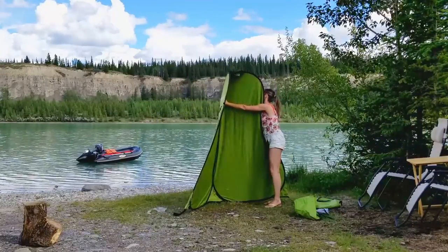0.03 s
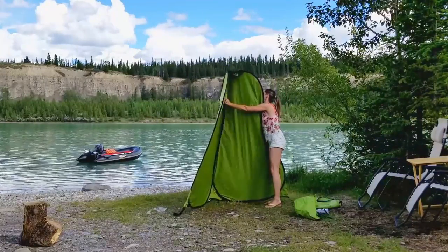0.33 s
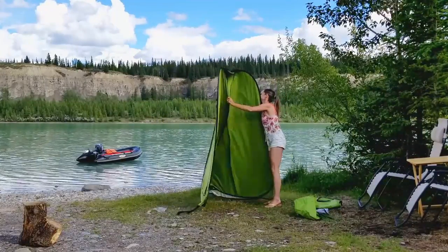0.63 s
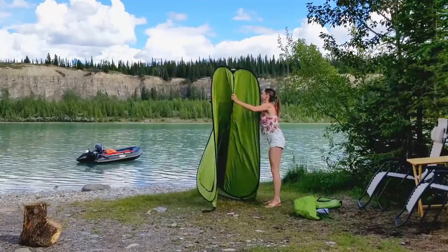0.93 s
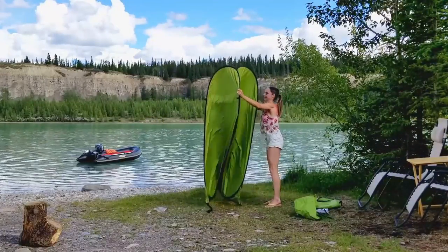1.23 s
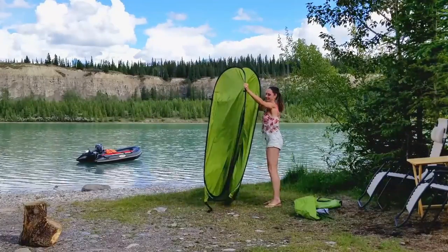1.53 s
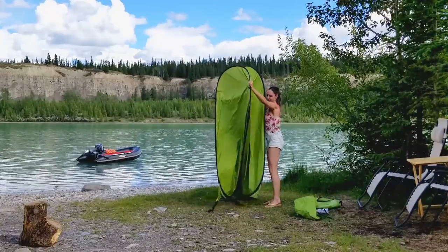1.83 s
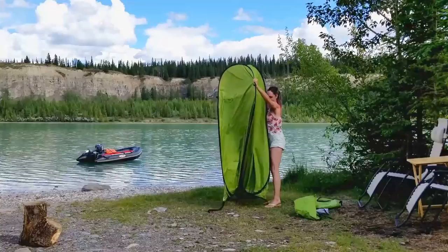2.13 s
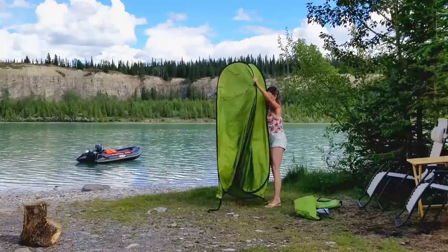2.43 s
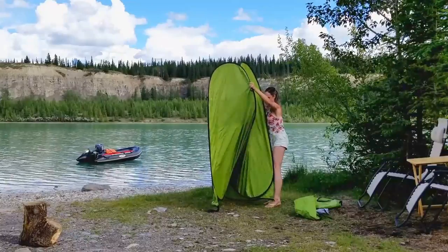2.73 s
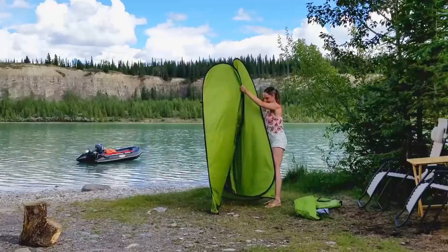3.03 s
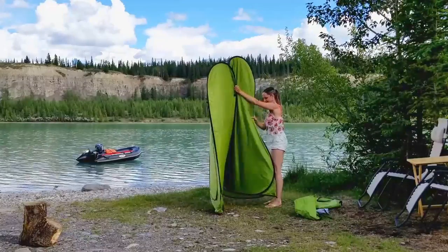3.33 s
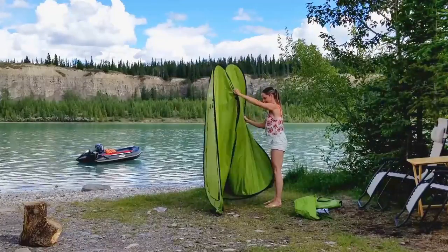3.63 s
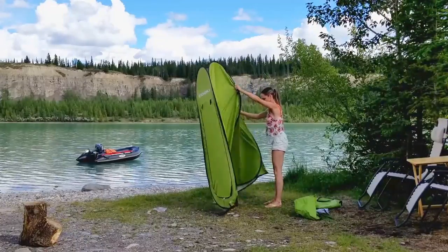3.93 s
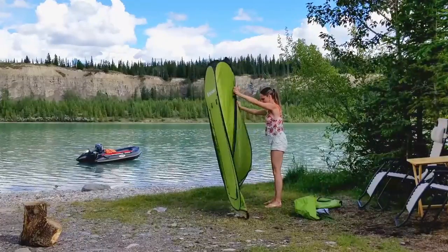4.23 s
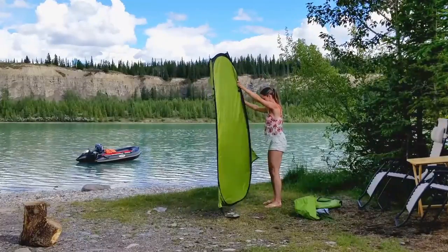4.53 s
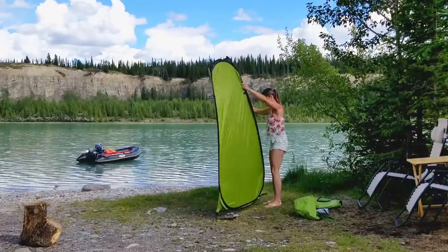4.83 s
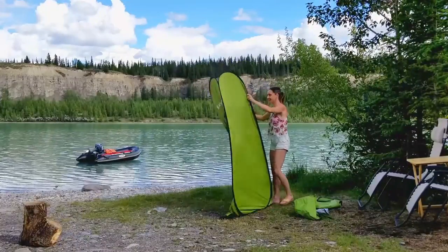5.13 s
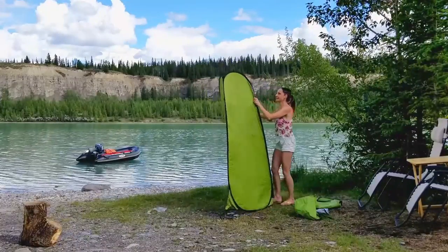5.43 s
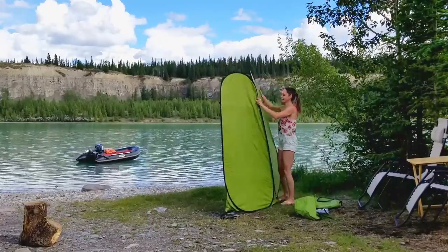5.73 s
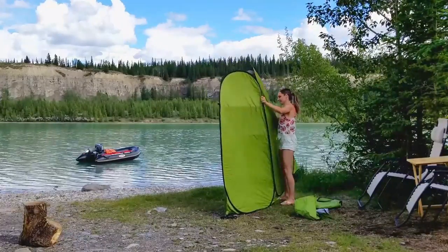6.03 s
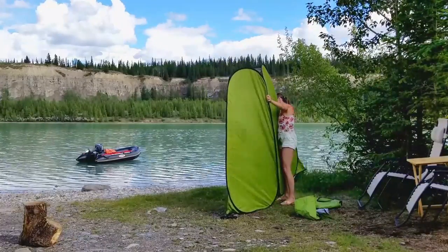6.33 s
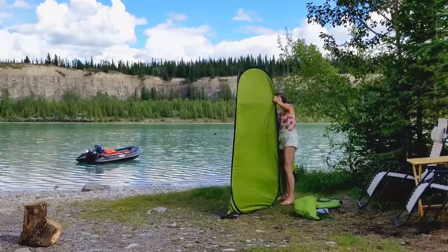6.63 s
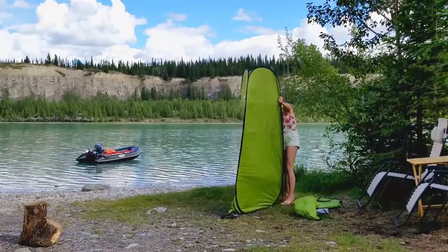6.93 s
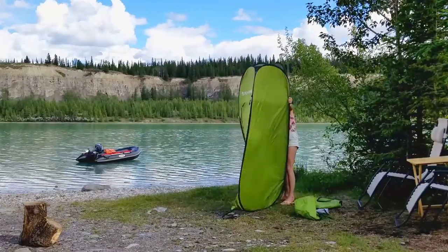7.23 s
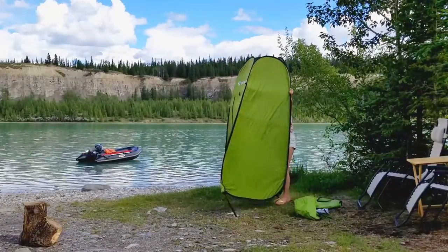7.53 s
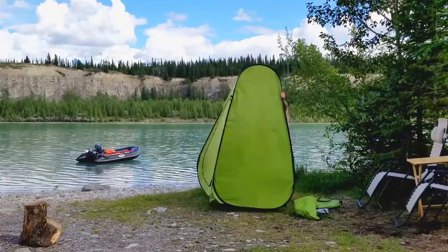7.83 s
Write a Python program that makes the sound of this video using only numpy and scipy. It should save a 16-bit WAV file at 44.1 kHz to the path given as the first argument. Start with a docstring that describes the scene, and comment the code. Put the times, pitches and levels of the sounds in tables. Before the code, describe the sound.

Close, centred nylon rustles in fits and starts as someone folds a pop-up tent outdoors. The fabric slides, crinkles and snaps, with occasional flaps, tiny squeaky skids and low bumps against a body-worn microphone. It eases off, builds to louder pulls, goes nearly still, then returns hissier with many sharp ticks. A high, pulsing grasshopper, a thin hiss of far insects and faint wind sit softly around it throughout.

```python
"""Nylon swishes and crinkles close up, pull by pull: a pop-up tent being folded on a lake shore.
Sliding cloth sounds through tiny fibre slips; creases buckle and snap, panels flap, ribbed weave skids.
The cloth also bumps and brushes a microphone worn by the person folding it.
Behind it, wide in stereo, a grasshopper rasps leg on wing over far insects and a faint breeze."""
import sys
import numpy as np
from scipy import signal
from scipy.fft import rfft, irfft, next_fast_len
from scipy.io import wavfile
from scipy.ndimage import uniform_filter1d, map_coordinates

SR = 44100
rng = np.random.default_rng(int(sys.argv[2]) if len(sys.argv) > 2 else 0)


def store_wav(level_fs):
    """Save 16-bit WAV to argv[1]."""
    pcm = np.round(np.clip(np.atleast_2d(level_fs), -1, 1) * 32767)
    wavfile.write(sys.argv[1], SR, pcm.T.astype(np.int16))


N = 351918

# cloth sliding on itself: (time [s], rise [s], hold [s], fall [s], swish drive [dB],
# folds re swish [dB], hiss re swish [dB])
PULLS = [(.01, 0.045, 0.041, 0.03, -39, -4.5, -17), (.14, .12, 0.14, 0.069, -39.5, -4, -16),
         (.41, 0.059, 0.25, 0.12, -38, -2.5, -5), (.66, 0.27, 0.18, 0.16, -38, -5, -10.5),
         (1.23, .09, 0.023, 0.28, -43.5, -4, -7), (1.55, 0.044, 0.013, 0.081, -44, -28, -5.5),
         (1.782, 0.013, 0.17, 0.13, -49, -10, 1), (2.19, 0.12, 0.051, .1, -49.5, -6.5, -2),
         (2.32, 0.018, .1, .1, -43.5, -2.5, -24), (2.42, 0.053, 0.071, .05, -38, 1, -16),
         (2.58, 0.061, 0.15, 0.12, -37.5, -5, -8.5), (2.81, 0.06, 0.094, .06, -35.5, -5, -10),
         (2.97, 0.05, 0.091, 0.2, -31, -3, -11.5), (3.22, 0.031, 0.054, .04, -36, -1.5, -11),
         (3.32, 0.052, 0.31, 0.082, -32, -2.5, -12), (3.63, 0.059, 0.095, 0.034, -28, -1.5, -17),
         (3.78, 0.028, 0.058, 0.034, -26.5, -1, -10.5), (3.9, 0.06, 0.16, .15, -40.5, -1.5, -5.5),
         (4.185, 0.0073, 0.013, .16, -30.5, -4, -18.5), (4.44, 0.052, 0.016, 0.078, -43, 4, -16),
         (4.6, 0.055, 0.12, .04, -57.5, -1, -21), (4.83, .04, 0.086, 0.1, -48, -29, -14),
         (4.93, 0.058, .13, 0.083, -47, -2, -11.5), (5.18, 0.018, 0.095, 0.17, -47.5, -3.5, -6.5),
         (5.33, 0.099, 0.051, 0.24, -37, -6.5, -11.5), (5.75, 0.11, .06, 0.046, -40, -6, -10),
         (5.91, 0.021, 0.15, 0.055, -33.5, -8.5, -9.5), (6.06, 0.054, .15, 0.054, -34.5, -6.5, -3),
         (6.3, 0.026, 0.037, 0.037, -39, 2, -10), (6.385, 0.039, 0.028, 0.037, -27.5, -4.5, -3),
         (6.5, 0.051, 0.074, 0.054, -41, -6.5, -3), (6.581, 0.063, .2, .045, -35.5, -16.5, 0.5),
         (6.919, 0.014, 0.013, 0.06, -46, 4, -20), (6.97, 0.05, 0.069, .08, -43.5, -1, -10),
         (7.11, 0.12, 0.023, 0.073, -30, -1, -6), (7.3, 0.062, 0.15, 0.078, -38, -7, -6),
         (7.51, 0.058, 0.084, 0.08, -36.5, -23, 0), (7.66, 0.02, .18, 0.052, -30, -8, -2),
         (7.89, .04, 0.041, .05, -39, -1, -14.5)]
# cloth brushing the microphone: (time [s], rise [s], hold [s], rumble drive [dB])
MIC_BRUSHES = [(.01, 0.025, 0.054, -43.5), (.12, 0.14, 0.048, -37.5), (0.333, .02, 0.011, -35),
               (.41, .03, 0.092, -43), (0.605, 0.036, 0.088, -38.5), (1.785, 0.0092, 0.016, -53),
               (2.492, 0.052, .015, -39), (2.694, 0.043, 0.018, -36), (3.138, 0.044, .01, -29.5),
               (3.675, .04, .17, -36), (4.063, 0.016, 0.018, -41), (4.19, .008, .03, -33),
               (4.25, .02, .02, -43), (6.092, 0.07, 0.067, -34.5), (6.3, 0.053, .11, -34.5),
               (7.132, 0.065, .05, -30.5), (7.344, 0.04, .18, -50.5), (7.678, 0.045, 0.14, -34.5),
               (7.91, .04, .03, -43)]
# cloth friction spectra: (frequency [Hz], relative density [dB])
SWISH_SPECTRUM = [(300, -40), (800, -12.5), (1200, -5), (1700, -2.5), (2500, 0), (3300, 0), (4300, -6),
                  (5500, -16), (8000, -25), (16000, -50)]
FOLDS_SPECTRUM = [(90, -19), (220, -11.5), (350, -2.5), (550, 0), (800, 1), (1100, -3), (1700, -12),
                  (4000, -33)]
HISS_SPECTRUM = [(2500, -6), (4200, 0.5), (5500, 0), (7000, -3), (9000, -8.5), (12000, -10), (16000, -21.5)]
RUMBLE_SPECTRUM = [(20, -28), (35, -24), (55, -11), (68, -4.5), (84, 0), (102, -2), (180, -1.5), (260, -5),
                   (400, -10), (1000, -48)]
# loudest creases snapping through: (time [s], level [dB], pitch [Hz])
LOUD_CREASES = [(.3636, -12.5, 606), (.497, -12, 2100), (.5053, -13, 1500), (.5702, -10, 3570),
                 (.6263, -8.5, 3250), (.6728, -14, 1710), (.849, -16, 2900), (.8894, -19.5, 1310),
                (1.3224, -24, 2310), (2.5485, -11.5, 1290), (2.9963, -12, 1450), (3.1483, -18, 1270),
                (3.2662, -10, 2800), (3.3749, -11, 1690), (3.6626, -3.5, 2750), (3.8118, -7.5, 2760),
                (4.1909, -9, 897), (4.1959, -15, 1250), (5.9363, -7.5, 1460), (5.952, -12, 3600),
                (5.9577, -6.5, 1700), (5.9762, -9.5, 3310), (6.0527, -10.5, 3850), (6.069, -9, 4730),
                (6.103, -8, 4500), (6.126, -12.5, 1730), (6.1977, -12.5, 2820), (6.267, -10, 3200),
                (6.3544, -9.5, 4740), (6.3701, -6.5, 2600), (6.447, -4, 3870), (6.65, -9.5, 3200),
                (6.6946, -11, 2860), (7.2421, -6.5, 3450), (7.5095, -15, 3750), (7.8704, -4.5, 4120)]
# panels flapping or bumping: (time [s], level [dB], pitch [Hz], t60 [s])
PANEL_FLAPS = [(.363, -22, 109, 0.08), (.627, -26, 474, 0.036), (.662, -22.5, 373, 0.04),
               (2.546, -25, 730, 0.077), (2.558, -22, 660, 0.029), (2.752, -24.5, 610, 0.073),
               (2.78, -24, 610, 0.059), (3.186, -27.5, 102, .12), (4.189, -17, 690, 0.14),
               (4.194, -25, 190, 0.11), (6.445, -21, 110, .08), (7.242, -24, 109, 0.11),
               (7.747, -15, 500, 0.081), (7.785, -22.5, 81.5, 0.25)]
# ribbed weave skidding: (time [s], length [s], start pitch [Hz], end pitch [Hz], level [dB])
WEAVE_SKIDS = [(1.282, 0.13, 429, 480, -45.5), (1.588, 0.063, 3270, 2430, -39),
               (2.701, 0.011, 3400, 3000, -24), (2.725, 0.0071, 2960, 2680, -25.5),
               (3.0, 0.14, 5530, 4900, -35), (3.265, 0.0084, 3340, 3020, -17),
               (5.39, 0.13, 4920, 5500, -41), (5.467, 0.13, 2330, 2970, -36),
               (5.973, .07, 2110, 1510, -30.5), (6.268, 0.0082, 3220, 3000, -26)]
# grasshopper loudness: (time [s], relative level [dB])
RASP_LEVEL = [(0, -44.5), (.5, -48), (.7, -39.5), (3.6, -44), (5.8, -39), (6.6, -46), (6.8, -44.5),
              (7.98, -65)]
# grasshopper pace: (time [s], stroke rate [Hz])
RASP_RATE = [(.7, 20.85), (2.9, 20.6), (4.4, 20.4), (6.55, 20.7), (6.8, 21.8)]
# grasshopper, far insect and breeze spectra: (frequency [Hz], relative density [dB])
RASP_SPECTRUM = [(3000, -31.5), (6000, -41), (7200, -15.5), (8200, -4.5), (9300, -4.5), (10200, -3),
                 (11100, -3), (12300, 7), (13300, -5), (14100, 2), (14800, 4.5), (15900, -2)]
INSECT_SPECTRUM = [(5000, -61), (7500, -16), (10000, -9), (11200, -5.5), (12400, 1.5), (14000, 2.5),
                   (15900, -3)]
BREEZE_SPECTRUM = [(20, -23), (80, 6), (200, -15), (650, 2), (1500, -26), (2800, 11.5), (4200, 4),
                   (6000, 7), (10000, 3.5), (16000, -18)]


def rustle(swish_gain, folds_gain, hiss_gain, rumble_gain):
    """Panels slide in fits and starts; all four layers catch and release together."""
    # a fast, hissing glide is even; a slow, dull drag catches more
    hiss_re_swish_db = 20 * np.log10(hiss_gain / swish_gain)
    grip = np.clip(0.7 - 0.027 * hiss_re_swish_db, 0.3, 1.5)
    catch_db = grip * (wobble(35) + 1.23 * wobble(170))
    swish = swish_gain * friction(SWISH_SPECTRUM, rate_hz=450, spread_db=4, share=0.27, patchy_db=2)
    folds = folds_gain * friction(FOLDS_SPECTRUM, rate_hz=220, spread_db=9.5, share=0.3, patchy_db=2)
    hiss = hiss_gain * friction(HISS_SPECTRUM, rate_hz=610, spread_db=3.5, share=0.16, patchy_db=2.57)
    rumble = rumble_gain * friction(RUMBLE_SPECTRUM, rate_hz=80, spread_db=8, share=0.2, patchy_db=0.5)
    layers = amp(0.12) * swish + amp(0.5) * folds + amp(2.5) * hiss + amp(-0.75) * rumble
    return amp(catch_db) * layers


def friction(spectrum, rate_hz, spread_db, share, patchy_db):
    """Countless fibre slips, with a share of the power in single crinkles of uneven size."""
    crinkles = rng.random(N) < rate_hz / SR
    sizes = amp(spread_db * np.minimum(rng.exponential(size=N), np.e)) * rng.choice([-1, 1], N)
    force = np.sqrt(share) * unit(crinkles * sizes) + np.sqrt(1 - share) * rng.standard_normal(N)
    return coloured(patchy(force, patchy_db), spectrum)


def patchy(x, depth_db):
    """Shifting folds favour now one band, now another."""
    bands = signal.stft(x, nperseg=512)[2]
    field = uniform_filter1d(rng.standard_normal(bands.shape), size=7, axis=0)
    field = uniform_filter1d(field, size=9, axis=1)
    return signal.istft(bands * amp(depth_db * unit(field)), nperseg=512)[1][:N]


def pulling(idle_db=(-70, -68, -67.5), brush_to_folds_db=-7, folds_to_rumble_db=-17.5):
    """Swish, folds, hiss and rumble gains: pulls, brushes and idle stirring add in power."""
    swish, folds, hiss = (np.full(N, amp(db) ** 2) for db in idle_db)
    for time_s, rise_s, hold_s, fall_s, db, folds_db, hiss_db in PULLS:
        power = amp(db) ** 2 * movement(time_s, rise_s, hold_s, fall_s)
        swish += power
        folds += amp(folds_db) ** 2 * power
        hiss += amp(hiss_db) ** 2 * power
    brush = sum(amp(db) ** 2 * movement(time_s, rise_s, hold_s, fall_s=0.061)
                for time_s, rise_s, hold_s, db in MIC_BRUSHES)
    rumble = brush + amp(folds_to_rumble_db) ** 2 * folds
    folds += amp(brush_to_folds_db) ** 2 * brush
    return np.sqrt([swish, folds, hiss, rumble])


def movement(time_s, rise_s, hold_s, fall_s, lead_s=0.04, depth_db=11.5):
    """Power envelope of one movement: unstick, speed up, glide, come to rest."""
    t = np.arange(N) / SR - time_s
    stuck = np.maximum(-t, 0) / lead_s
    rising = np.maximum(1 - t / rise_s, 0)
    falling = np.maximum(t - rise_s - hold_s, 0) / fall_s
    return amp(-np.minimum(depth_db * (stuck + rising + falling), 100)) ** 2


def snaps(creases, rise_s=0.0001, ring_cycles=4.1, shiver_db=-22, shiver_t60_s=0.037, low_cut_hz=330):
    """A crease buckles: sharp edge, a few cycles of ring, a brief shiver of the cloth around it."""
    track = np.zeros(N)
    t = np.arange(-SR // 500, SR // 25) / SR
    age_s = np.maximum(t, 0)
    cloth_noise = coloured(rng.standard_normal(N), SWISH_SPECTRUM)
    edge = amp(-16) * np.sin(2 * np.pi * 6000 * t) * np.exp(-(t / 0.00009) ** 2)
    for time_s, db, hz in creases:
        swell = np.exp(-(np.minimum(t, 0) / (rise_s + 0.16 / hz)) ** 2)
        ring = np.cos(2 * np.pi * hz * t) * amp(-60 * age_s * hz / ring_cycles)
        shiver = amp(shiver_db - 60 * age_s / shiver_t60_s) * piece(cloth_noise, len(t))
        sharpness = hz / 3500  # small stiff creases are higher and sharper
        snap = swell * (ring + shiver) + sharpness * edge
        add(track, time_s + t[0], rng.choice([-1, 1]) * amp(db) * snap)
    return filtered(track, lambda hz: hz ** 2 / (hz ** 2 + low_cut_hz ** 2))


def small_creases(swish_gain, rate_hz=36, over_db=11.5, spread_db=1.5, centre_hz=2650, spread_oct=0.5):
    """Lesser creases give way at random, as hard as the pull: (time [s], level [dB], pitch [Hz])."""
    onsets = np.flatnonzero(rng.random(N) < rate_hz / SR)
    strength, pitch = np.clip(rng.standard_normal((N, 2))[onsets], -2, 2).T
    db = 20 * np.log10(swish_gain[onsets]) + over_db + spread_db * strength
    return list(zip(onsets / SR, db, centre_hz * 2 ** (spread_oct * pitch)))


def flaps(attack_s=0.00041, damping=1.1):
    """A panel jerks taut: a heavily damped boom, with more crackle the tighter it is."""
    track = np.zeros(N)
    t = np.arange(SR // 4) / SR
    crackle = friction(SWISH_SPECTRUM, rate_hz=900, spread_db=3, share=0.4, patchy_db=1)
    for time_s, db, hz, t60_s in PANEL_FLAPS:
        edges_hz = [hz / (1 + damping), hz * (1 + damping / 2)]
        band = signal.butter(2, edges_hz, "bandpass", fs=SR, output="sos")
        boom = unit(signal.sosfilt(band, rng.standard_normal(2 * len(t)))[len(t):])
        tightness = hz / 700
        crack = amp(-5) * tightness * piece(crackle, len(t))
        envelope = amp(db - 60 * t / t60_s) * (1 - np.exp(-t / attack_s))
        add(track, time_s, envelope * (boom + crack))
    return track


def skids(roughness=0.066):
    """Taut ribbed weave skids over an edge: a short rough whistle, pitch following slide speed."""
    track = np.zeros(N)
    for time_s, length_s, start_hz, end_hz, db in WEAVE_SKIDS:
        progress = np.linspace(0, 1, int(length_s * SR))
        glide_hz = start_hz + (end_hz - start_hz) * progress
        hz = glide_hz * (1 + roughness * wobble(912)[:len(progress)])
        envelope = amp(db) * np.sin(np.pi * np.sqrt(progress)) ** 2
        add(track, time_s, envelope * np.sin(2 * np.pi * np.cumsum(hz) / SR))
    return track


def grasshopper(stroke_db=3, uneven_db=1.35, trim_db=3.5):
    """A leg rasps along the wing; up and down strokes differ slightly."""
    phase_rad = 2 * np.pi * np.cumsum(curve(RASP_RATE)) / SR
    strokes = unit(amp(stroke_db * np.cos(phase_rad) - uneven_db * np.cos(phase_rad / 2)))
    return amp(curve(RASP_LEVEL) + trim_db) * strokes * stereo_noise(RASP_SPECTRUM, correlation=-0.61)


def far_insects():
    """Many distant insects merge into one hiss, slightly to the right."""
    pan = amp([[-0.5], [0.5]])
    return pan * amp(-39 + 0.4 * wobble(13)) * stereo_noise(INSECT_SPECTRUM, correlation=-0.57)


def breeze():
    """Faint, wavering wind over water and trees."""
    return amp(-56 + 3.2 * wobble(2.6)) * stereo_noise(BREEZE_SPECTRUM, correlation=0.69)


def amp(db):
    """Decibels to gain."""
    return 10 ** (np.asarray(db) / 20)


def unit(x):
    """Scale to rms 1."""
    return x / np.sqrt(np.mean(x ** 2) + 1e-20)


def curve(rows):
    """Interpolate (time [s], value) rows per sample."""
    return np.interp(np.arange(N) / SR, *np.transpose(rows))


def wobble(rate_hz):
    """Smooth random curve at rms 1, knots at rate_hz."""
    knots = rng.standard_normal(int(N * rate_hz / SR) + 4)
    return unit(map_coordinates(knots, [np.arange(N) * rate_hz / SR]))


def filtered(x, response):
    """Apply the gain response(hz) by FFT."""
    size = next_fast_len(N + 8192)
    return irfft(rfft(x, size) * response(np.fft.rfftfreq(size, 1 / SR)), size)[..., :N]


def coloured(x, spectrum):
    """Shape x by (frequency [Hz], level [dB]) rows, to rms 1."""
    knots_hz, db = np.transpose(spectrum)
    return unit(filtered(x, lambda hz: amp(np.interp(np.log(hz + 1), np.log(knots_hz), db))))


def stereo_noise(spectrum, correlation):
    """Coloured noise with a set left-right correlation."""
    mid, side = coloured(rng.standard_normal((2, N)), spectrum)
    width_rad = np.arccos(correlation) / 2
    return np.cos(width_rad) * mid + np.sin(width_rad) * np.array([side, -side])


def piece(x, size):
    """Random stretch of x."""
    return x[rng.integers(len(x) - size):][:size]


def add(track, time_s, sound):
    """Mix sound into track at time_s."""
    start = max(round(time_s * SR), 0)
    track[start:start + len(sound)] += sound[:max(N - start, 0)]


def scene():
    """Cloth close and centred, shore all around."""
    swish_gain, folds_gain, hiss_gain, rumble_gain = pulling()
    sliding = rustle(swish_gain, folds_gain, hiss_gain, rumble_gain)
    cloth = sliding + snaps(LOUD_CREASES + small_creases(swish_gain)) + flaps() + skids()
    return cloth + grasshopper() + breeze() + far_insects()


def record(dry, low_cut_hz=42, band_limit_hz=15930):
    """The small microphone loses the deepest bass; a hard band limit follows."""
    highpass = signal.butter(3, low_cut_hz, "highpass", fs=SR, output="sos")
    return filtered(signal.sosfilt(highpass, dry), lambda hz: hz < band_limit_hz)


dry = scene()
out = record(dry)
store_wav(out)
```